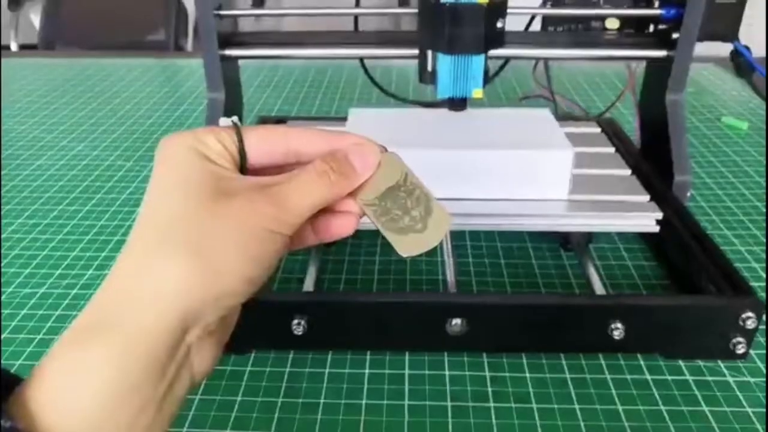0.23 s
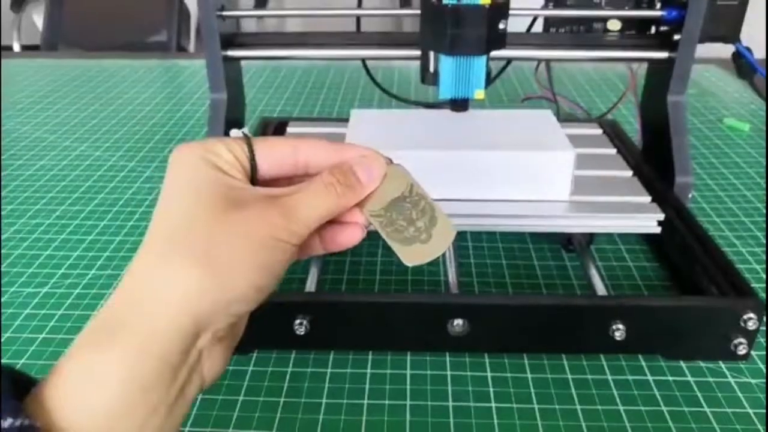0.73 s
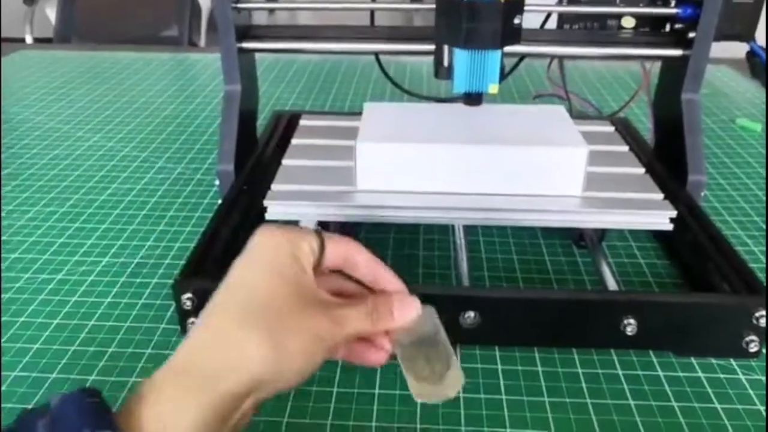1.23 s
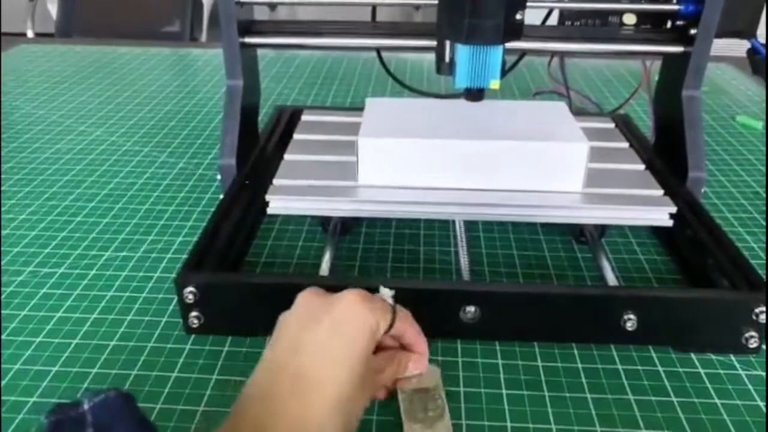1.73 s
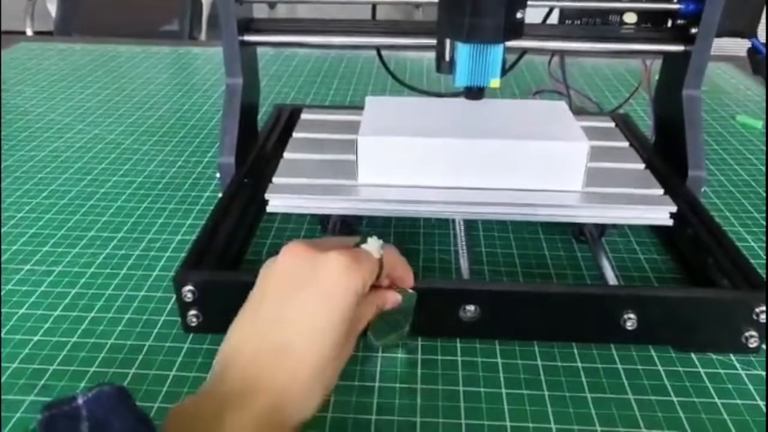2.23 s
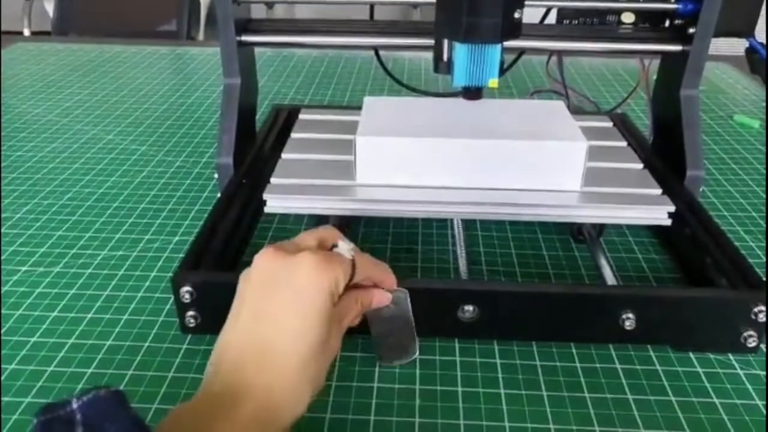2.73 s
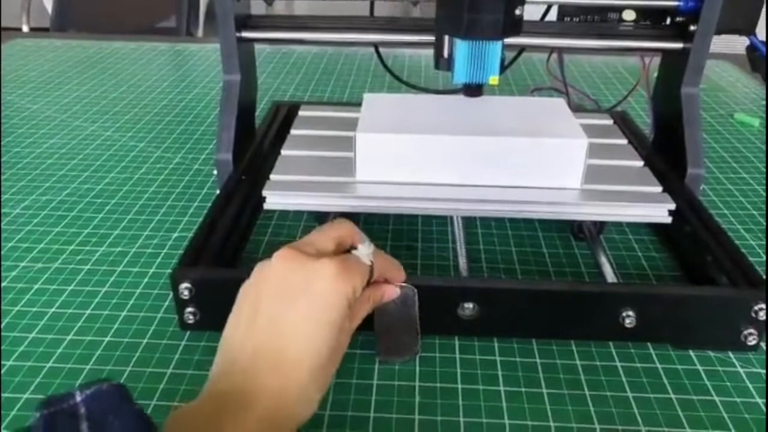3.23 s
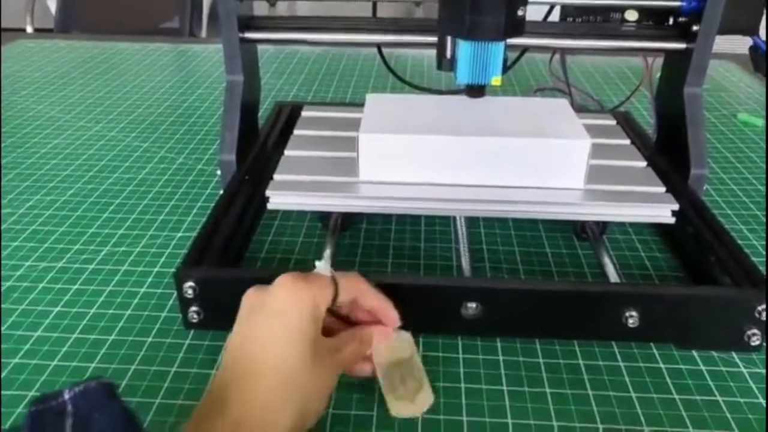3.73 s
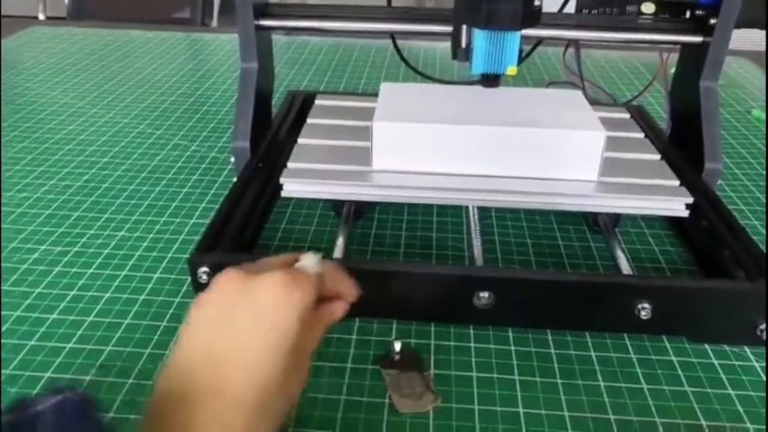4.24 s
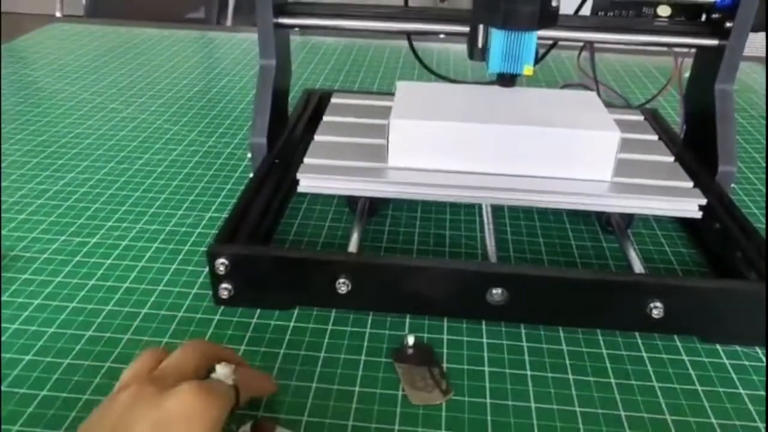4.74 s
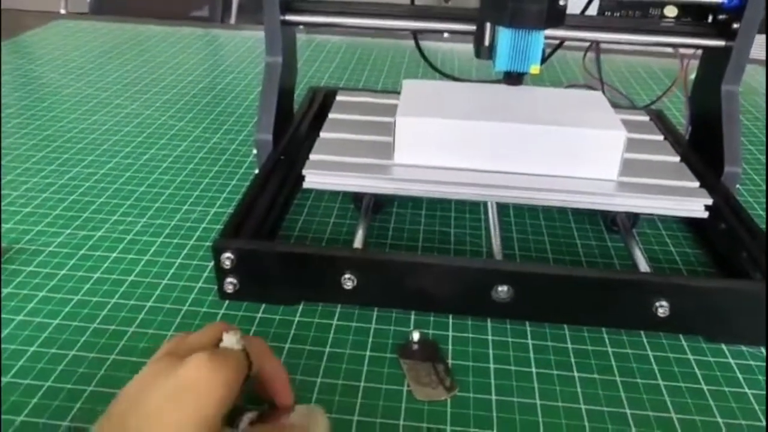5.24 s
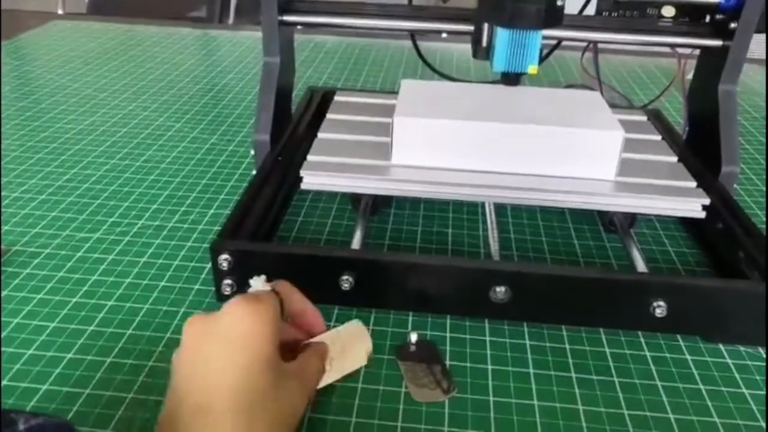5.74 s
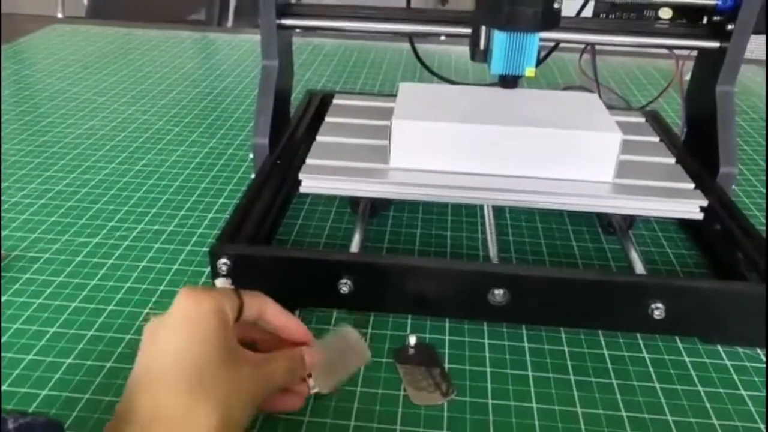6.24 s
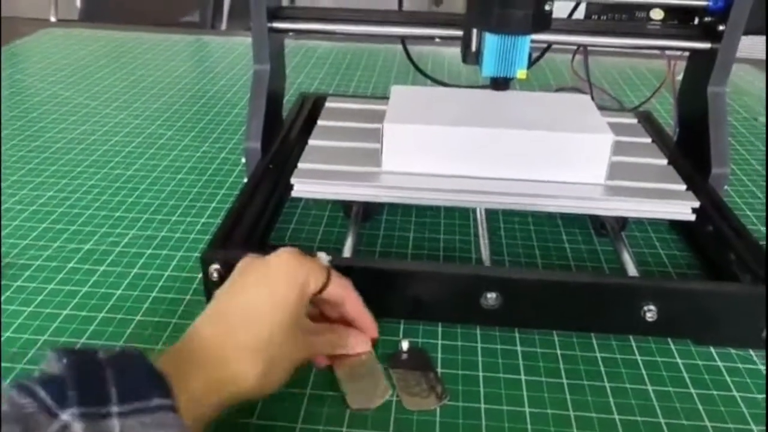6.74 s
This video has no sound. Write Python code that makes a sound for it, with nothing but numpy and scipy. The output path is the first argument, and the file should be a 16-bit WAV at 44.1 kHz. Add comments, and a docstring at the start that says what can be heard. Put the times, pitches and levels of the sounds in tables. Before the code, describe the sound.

For the first 1.7 seconds only a faint fan is heard, a wavering hum and thin whine with soft rushing air, over swelling low rumble. At 1.74 a loud, dry clack of metal on a matted table rings out, with a short fluttering tail from a bare room. A brief scrape and light taps follow at 2.15, 2.5, 2.8 and 2.96. Firm knocks land at 3.8, 3.98 (the strongest of these) and 4.2, with chain rustle fading until about 4.9 and a dull sleeve rub. After a lull, a soft bump at 5.24 leads to quick brushing slips from 5.4 and bright tiny clinks around 5.6 to 5.75. More delicate clinks come near 6.1 to 6.2, a tiny squeak at 6.3, then muffled bumps, short scrapes and faint clinks from 6.55 to 6.9. Close stereo microphones.

```python
"""Small metal pendants are handled and set down on a cutting mat on a table, close to the microphones.
Each touch is a push that rings damped table modes, with a crack of noise from the metal edge.
Later a pendant slides (showers of tiny slips), and its ring and chain clink (decaying high modes).
The room is bare and ringing: random reflections that flutter and die band by band.
A fan hums and whines faintly nearby (wavering tones, shaped noise), over rumble and a sleeve's rub."""
import sys
import numpy as np
from scipy import signal
from scipy.fft import rfft, irfft
from scipy.io import wavfile

SR = 44100
rng = np.random.default_rng(int(sys.argv[2]) if len(sys.argv) > 2 else 0)


def output_pcm(signal):
    """Save a mono or channel-first signal as 16-bit PCM at the path in sys.argv[1].

    Samples are clipped to [-1, 1] before scaling.
    """
    pcm = np.clip(np.atleast_2d(signal).T, -1, 1) * 32767
    wavfile.write(sys.argv[1], SR, np.round(pcm).astype(np.int16))


N = 308533
TIME = np.arange(N) / SR  # s

# Spectra below are (frequency [Hz], relative density [dB per Hz]); left-right dB is positive to the left.

# Low room rumble, and the upper bass that swells with it: spectra
RUMBLE_SPECTRUM = [(20, -32), (33, -8), (44, -0.5), (52, 6.5), (62, 1.5), (75, -6), (95, -5), (130, -49)]
UPPER_BASS_SPECTRUM = [(60, -36), (125, -4), (200, -3), (330, -12), (600, -44)]
# Swells of the rumble: (time of the top [s], length [s], rise [dB])
SWELLS = [(.5, 0.46, 4.2), (1.28, 0.68, 4.4), (1.87, 0.59, 10.3), (4.08, 1, 8.1), (5.5, 1, 5.3)]
RUMBLE_REST_DB = -64.5
# Likeness of the two microphones in steady noise: (frequency [Hz], likeness [0-1])
LIKENESS = [(50, 0.82), (190, 0.88), (300, 0.68), (500, 0.041), (1000, 0.26), (2000, 0.26), (4000, 0.042),
            (8000, 0.071), (14000, 0.4)]
# Balance of steady noise: (frequency [Hz], left-right [dB])
BALANCE = [(60, 0.5), (200, -1), (400, 1), (700, 0), (1200, 5), (1600, 0), (2300, -7.5), (4200, -5),
           (7800, -1), (14000, 0)]

# Fan body and rushing air: spectra
BODY_SPECTRUM = [(40, -41), (80, -4), (115, 2), (160, -3), (220, 2.5), (300, -3), (400, -6), (520, -11.5),
                 (700, -9.5), (900, -8.5), (1200, -39)]
AIR_SPECTRUM = [(600, -28), (950, -7), (1200, -11), (1400, -14), (1650, -2.5), (2000, 5), (2400, -9.5),
                (2800, -20), (3200, -11), (5000, -16), (7000, -16), (8000, -20.5), (9300, -21.5),
                (14000, -42.5)]
BODY_DB, AIR_DB = -62.5, -54.5
# Blade tone and motor whine shift as the hand moves in front of the fan: (time [s], level [dB])
BLADE_LEVEL = [(0, -61), (.45, -58.5), (.6, -55.5), (.92, -63), (1.2, -54.5), (1.53, -62), (1.85, -53),
               (2.15, -62.5), (2.75, -55), (3.05, -60), (3.55, -57.5), (3.85, -61.5), (4.25, -55.5),
               (4.65, -60), (5.2, -60.5), (5.7, -57), (6.05, -64), (7, -63.5)]
WHINE_LEVEL = [(0, -70.5), (.9, -69), (1.18, -64), (1.36, -56), (1.5, -60.5), (1.66, -61.5), (1.85, -59),
               (2.25, -65), (2.9, -63), (3.7, -65), (4.02, -60.5), (4.25, -67), (4.9, -73), (6.78, -73.5),
               (6.93, -61.5)]
# Weaker fan tones: multiples of the shaft rate
TONE_ORDERS = [3, 15, 25, 75, 120]
# One row for each of these: (level [dB], unsteadiness [0-1], left-right [dB], follows whine [dB per dB])
TONES = [(-76, 0.35, 0, 0.5), (-72, 0, 5.5, 0), (-77, 0.43, -20, 0.5), (-74.5, 0.6, 1, 0.5),
         (-84.5, 0, 18.5, 0.53)]
# Air rings in the fan housing: (frequency [Hz], width [Hz], level [dB])
HOUSING = [(1405, 145, -66.5), (2012, 120, -65), (2672, 346, -61.5)]
SHAFT_HZ = 38.3
BLADE_ORDER, WHINE_ORDER = 5, 50  # multiples of the shaft rate
AIR_FOLLOWS, HOUSING_FOLLOWS = 0.12, 0.28  # dB per dB of whine
RIGHT_LAG_S = 30 / SR  # the fan reaches the right microphone later

# Sleeve and forearm on the table: (time of the top [s], length [s], level [dB]), then spectrum
SLEEVE_MOVES = [(4.017, 0.33, -59.5), (4.237, 0.46, -59.5), (4.676, 0.28, -59.5)]
SLEEVE_SPECTRUM = [(60, -25), (100, 1), (140, -2), (200, -3), (400, -11), (800, -48)]

# Decay of the bare room: (frequency [Hz], t60 [s])
ROOM_DECAY = [(150, 0.66), (500, 0.44), (1000, 0.56), (2500, 0.57), (5000, 0.57), (10000, 0.17),
              (14000, 0.22)]
# Reflections from the machine and nearest walls: (delay [s], level [dB], left-right [dB])
ECHOES = [(.0095, -19, -12), (0.02, -20.5, 4)]
WALL_S = 0.009  # return from the nearest wall, about 3 m of path
# Flutter between two walls: first peak after the wall return, round trip, depth either way
FLUTTER_FIRST_S, FLUTTER_TRIP_S, FLUTTER_DB = 0.011, 0.025, 1.5
# What the whole table sends into the room: spectrum as (frequency [Hz], level [dB])
TABLE_WASH = [(100, -66), (200, -21), (400, -8.5), (700, -7), (950, 3.5), (1200, 1), (1550, 0), (2100, -5),
              (2800, -7.5), (3800, -21), (5200, -19), (6200, -24), (8000, -25.5), (11000, -31),
              (14000, -54)]

# The pendant squeaks once as it turns in the fingers
SQUEAK_START_S, SQUEAK_LENGTH_S, SQUEAK_HZ, SQUEAK_DB = 6.294, 0.024, 2040, -47
# Strokes of pendant and chain: (start [s], length [s], share spent swelling [0-1], slips [per s],
# soft rubbing on the mat [dB], scraping that rings the table [dB], chain rustle [dB])
SLIDES = [(2.035, 0.15, 0.3, 490, -83, -52.5, -94), (3.999, 0.19, 0.24, 960, -88, -56, -60),
          (4.202, 0.72, 0.6, 1600, -87, -96, -62), (5.397, .1, 0.25, 3300, -52, -78, -85),
          (5.457, 0.055, 0.47, 2900, -49.5, -90, -60), (5.521, 0.21, 0.62, 3500, -70, -65, -53),
          (5.659, .12, 0.51, 3500, -66, -72, -54.5), (6.549, 0.12, 0.24, 2700, -70, -52, -61),
          (6.739, 0.065, 0.69, 1600, -62, -70, -89), (6.825, 0.085, 0.27, 2100, -62.5, -58, -86)]
# Rubbing, scraping and rustle: spectra
RUB_SPECTRUM = [(90, -19), (150, -7), (350, -2), (480, -8), (620, -0.5), (850, -1), (1080, 1.5),
                (1450, -17), (3000, -15), (9000, -39)]
SCRAPE_SPECTRUM = [(300, -27), (750, -10), (980, 9.5), (1200, -4.5), (1500, 7), (1800, 3), (2600, -11),
                   (4500, -16), (9000, -49)]
RUSTLE_SPECTRUM = [(600, -46), (1700, 3.5), (2500, -2), (4000, -4.5), (7000, -11), (10000, -13),
                   (13500, -29), (15000, -30)]
# The carried chain trembles: (start [s], length [s], link touches [per s], level [dB])
TREMBLES = [(5.541, 0.22, 350, -67), (6.032, 0.25, 290, -69), (6.501, 0.46, 200, -74.5)]
# Ring and chain strike the pendant: (time [s], level [dB], left-right [dB],
# brightness: level of the top modes [dB], low ting [dB], dry tick [dB],
# main ring, which shifts with the grip [Hz], first rebound [dB])
CLINKS = [(5.61, -51, -1, -11, -2, 8, 9700, -20), (5.664, -53, 0, -9, 5, 6, 10000, -20),
          (5.668, -47, -6, -3, 21, 20, 10100, -12), (5.706, -45.5, 7, 0, 0, 5, 10230, -11),
          (5.7195, -52, 3, 1, -2, 1, 10200, -6), (5.7319, -41, 7, -1, 2, -3, 10230, -16),
          (6.115, -58, 3, -9, 20, -6, 9860, -7), (6.149, -61, 7, -8, 3, -10, 10000, -6),
          (6.181, -43, 1, -11, -8, 3, 9950, -18), (6.1858, -43.5, 7, -14, -5, -12, 10100, -9),
          (6.576, -63, -2, -13, 7, 4, 9900, -6), (6.599, -58, 7, -5, 9, -4, 10140, -8),
          (6.731, -52.5, 3, -7, 13, -6, 9850, -4), (6.750, -62, 3, 0, 8, -6, 10000, -12),
          (6.810, -66, 7, -12, 23, -6, 10090, -18)]
# Modes of pendant and ring when the main ring is at MAIN_RING_HZ: (frequency [Hz], level [dB], t60 [s])
PENDANT = [(3820, -21, 0.013), (3880, -15, 0.022), (6450, -25, 0.0097), (9100, -9, 0.011),
           (9680, -3, 0.016), (10200, -5.5, 0.028), (10130, -8, 0.028), (10350, -14, .012),
           (11660, -10.5, 0.024), (13400, -15, 0.021)]
MAIN_RING_HZ = 10100
REBOUND_S, NEXT_REBOUND_DB = 0.0072, -2  # mean gap, change from one rebound to the next

# Pendant meets the mat: (time [s], level [dB], hardness as treble tilt [dB per octave], room send [dB],
# place: upper modes [dB], weight: low modes [dB], middle mode near 1.25 kHz [dB])
KNOCKS = [(1.7410, -13.5, 0.5, -9, -0.5, -1.5, 2), (2.149, -45, -3, -12, 11, 8, 0),
          (2.501, -32, -1, -9.5, 5, 13, 4), (2.789, -39, -1.5, -7.5, 8.5, 13, -6),
          (2.962, -51, 4, -8, 12, 11, 0), (3.8151, -22, -2, -9, 7.5, 9, -6),
          (3.977, -15, 0.9, -9, 4, 9, -4), (4.2060, -20.5, -2, -10, -5.5, 5, 0),
          (5.238, -40, -16, -5.5, 8, 12, 0), (6.5537, -38, -18.5, -1.5, 20, 11, -4),
          (6.582, -48, -14, -1, 16, 2, 0), (6.606, -48, -14, -6, 16, -3, 1),
          (6.621, -53, -14, -10, 16, 0, 3), (6.861, -34.5, -16, -3, -12, 2, -6)]
# Modes of the table top under the mat: (frequency [Hz], level [dB], t60 [s])
TABLE = [(306, -25, 0.027), (432, -24.5, 0.022), (653, -18, 0.0073), (968, -12.5, 0.04), (1010, -11, 0.036),
         (1360, -24.5, 0.026), (1514, -3.5, 0.013), (2200, -20.5, 0.01), (2940, -31, 0.051),
         (3560, -9, 0.0061), (4870, -19, 0.0063), (6920, -20.5, 0.0057), (7500, -35, 0.028),
         (9900, -38, 0.046)]
# Contact of the metal edge itself: spectrum
CRACK_SPECTRUM = [(300, -42), (1500, 12), (2500, 18), (4000, 1.5), (6000, 12), (9000, 1), (11500, 0.5),
                  (14000, -20)]
TABLE_LOW_HZ = 290  # the table top radiates little below this
EDGE_HZ = 14100  # top of the recorder's band


def amp(db):
    """Amplitude factor of a level in dB."""
    return 10 ** (np.asarray(db) / 20)


def evened(x):
    """Scales x to unit RMS."""
    return x / np.sqrt(np.mean(abs(x) ** 2) + 1e-20)


def read(points, hz):
    """Reads a table at hz, interpolating over log frequency."""
    f, value = np.transpose(points)
    return np.interp(np.log(hz + 1), np.log(f + 1), value)


def curve(rows):
    """Joins (time, value) rows by straight lines over the whole length."""
    return np.interp(TIME, *np.transpose(rows))


def hump(top_s, length):
    """Smooth rise from 0 to 1 and back, centred on top_s."""
    return np.cos(np.pi * np.clip((TIME - top_s) / length, -0.5, 0.5)) ** 2


def pan(db):
    """Splits a left-right difference evenly between the two sides."""
    return amp(np.array([[db], [-db]]) / 2)


def add(mix, s, sound):
    """Adds sound to mix in place from time s, cut at the end."""
    part = mix[:, round(s * SR):][:, :sound.shape[1]]
    part += sound[:, :part.shape[1]]


def coloured(x, spectrum):
    """Gives x the spectrum, at unit level."""
    n = x.shape[-1]
    gain = amp(read(spectrum, np.fft.rfftfreq(n, 1 / SR)))
    return evened(irfft(rfft(x) * gain, n))


def random_touches(shape, per_s, grain_db):
    """Sparse contacts at random times, of random sizes."""
    present = rng.random(shape) < per_s / SR
    return present * amp(grain_db * np.minimum(rng.exponential(1, shape), 2))


def right_lag_phase(hz):
    """Phase by which the right side trails the left; the bass arrives together."""
    return 2 * np.pi * hz * RIGHT_LAG_S * np.clip((hz - 150) / 700, 0, 1)


def ambience(spectrum):
    """Steady noise that the two microphones partly share."""
    hz = np.fft.rfftfreq(N, 1 / SR)
    a, b = rfft(rng.standard_normal((2, N)))
    same = np.where(hz < 120, 1, np.clip(read(LIKENESS, hz), 0, 1))
    left = a * np.exp(1j * right_lag_phase(hz))
    right = same * a + np.sqrt(1 - same ** 2) * b
    balance = amp(np.outer([0.5, -0.5], read(BALANCE, hz)))
    return coloured(irfft(np.array([left, right]) * balance, N), spectrum)


def rumble(upper_db=-69):
    """Low room noise with a few smooth swells, which reach up into the upper bass."""
    swell_db = sum(db * hump(s, length) for s, length, db in SWELLS)
    low = amp(RUMBLE_REST_DB) * ambience(RUMBLE_SPECTRUM)
    upper = amp(upper_db) * ambience(UPPER_BASS_SPECTRUM)
    return amp(swell_db) * (low + upper)


def wander(width):
    """Slow complex noise of the given bandwidth in Hz."""
    hz = np.fft.fftfreq(N, 1 / SR)
    noise = rng.standard_normal(N) + 1j * rng.standard_normal(N)
    return evened(np.fft.ifft(np.fft.fft(noise) / (1 + (2 * hz / width) ** 2)))


def from_fan(carrier, hz):
    """A narrow-band sound from the fan, as both microphones hear it."""
    lag = np.array([[0], [right_lag_phase(hz)]])
    return np.sqrt(2) * (carrier * np.exp(1j * (2 * np.pi * hz * TIME - lag))).real


def fan(blade_shake=0.37, whine_shake=0.32):
    """Unsteady blade tones and motor whine at multiples of the shaft rate, housing rings and rushing air."""
    whine_db = curve(WHINE_LEVEL)
    lift_db = whine_db - whine_db.mean()
    out = amp(BODY_DB) * ambience(BODY_SPECTRUM)
    out += amp(AIR_DB + AIR_FOLLOWS * lift_db) * ambience(AIR_SPECTRUM)
    for order, (db, shake, side_db, follows) in zip(TONE_ORDERS, TONES):
        tone = from_fan(evened(1 + shake * wander(5.4)), order * SHAFT_HZ)
        out += amp(db + follows * lift_db) * pan(side_db) * tone
    blades = from_fan(evened(1 + blade_shake * wander(12.0)), BLADE_ORDER * SHAFT_HZ)
    out += amp(curve(BLADE_LEVEL)) * blades
    whine = from_fan(evened(1 + whine_shake * wander(15)), WHINE_ORDER * SHAFT_HZ)
    out += amp(whine_db) * pan(-23.5) * whine
    housing = sum(amp(db) * pan(-0.63) * from_fan(wander(width), hz) for hz, width, db in HOUSING)
    return out + amp(HOUSING_FOLLOWS * lift_db) * housing


def sleeve():
    """Cloth drags softly over the table as the arm draws back: dull noise in smooth humps."""
    push = sum(amp(db) * hump(s, length) for s, length, db in SLEEVE_MOVES)
    return push * ambience(SLEEVE_SPECTRUM)


def room(x, recover_s=0.16):
    """Random reflections after the nearest wall's delay: a fluttering tail, each band dying at its own speed."""
    reflections_per_s = 3500
    taps = rng.choice([-1, 1], (2, SR)) * (rng.random((2, SR)) < reflections_per_s / SR)
    taps = taps * amp(FLUTTER_DB * np.cos(2 * np.pi * (TIME[:SR] - FLUTTER_FIRST_S) / FLUTTER_TRIP_S))
    hz, t, bands = signal.stft(taps, SR, nperseg=256)
    decay = amp(-60 * t / read(ROOM_DECAY, hz)[:, None])
    # the tail starts held down, as by the recorder's gain control, then recovers
    recovery = 1 - 0.5 * np.exp(-t / recover_s)
    tail = signal.istft(bands * decay * recovery, SR, nperseg=256)[1]
    tail = np.pad(tail, ((0, 0), (round(WALL_S * SR), 0)))
    return signal.fftconvolve(x.mean(0)[None], tail / np.linalg.norm(tail[0]), axes=1)[:, :N]


def wash(level_db, tilt_db, place_db, weight_db, size=1024):
    """Summed over all directions, the table's many modes merge into one broad pulse for the room."""
    hz = np.fft.rfftfreq(size, 1 / SR)
    octaves = np.clip(np.log2((hz + 1) / 1000), 0, 2)  # above 1 kHz
    low = np.clip((900 - hz) / 300, 0, 1)
    colour_db = read(TABLE_WASH, hz) + tilt_db * octaves
    colour_db += place_db * np.minimum(octaves, 0.5) + weight_db * low / 2
    return np.roll(irfft(amp(level_db + colour_db)), size // 8)[None]


def squeak():
    """A brief, nearly pure stick-slip tone."""
    swell = np.sin(np.pi * np.clip((TIME - SQUEAK_START_S) / SQUEAK_LENGTH_S, 0, 1))
    return amp(SQUEAK_DB) * pan(-5) * swell * np.sin(2 * np.pi * SQUEAK_HZ * TIME)


def slides(grain_db=3):
    """Many tiny slips of metal over the mat, and of chain links over each other; strokes swell and fade."""
    out = np.zeros((2, N))
    for start, length, swell, slips_per_s, rub_db, scrape_db, rustle_db in SLIDES:
        n = max(round(length * SR), 256)
        slips = random_touches(n, slips_per_s, grain_db) * rng.choice([-1, 1], (2, n))
        stroke = amp(rub_db) * coloured(slips, RUB_SPECTRUM)
        stroke += amp(scrape_db) * coloured(slips, SCRAPE_SPECTRUM)
        stroke += amp(rustle_db) * coloured(slips, RUSTLE_SPECTRUM)
        pressure = np.interp(np.arange(n) / n, [0, np.clip(swell, 0.05, 0.95), 1], [0, 1, 0])
        add(out, start, stroke * np.sin(np.pi / 2 * pressure) ** 2)
    return out


def clink(level_db, bright_db, ting_db, tick_db, ring_hz, scatter_db=4.0, tick_t60=0.011, rise_s=0.00034):
    """Metal on metal: a tick and a brief high ring; brightness lifts the top modes, a plate blow the ting."""
    t = np.arange(4096) / SR
    hz, db, t60 = np.transpose(PENDANT)[:, :, None]
    scatter, detune = rng.standard_normal((2, len(PENDANT), 1))
    low, top, gripped = hz < 5000, hz > 11000, (hz > 5000) & (hz < 12500)
    hz = hz * np.where(gripped, ring_hz / MAIN_RING_HZ, 1) * (1 + 0.005 * detune)
    size_db = db + scatter_db * scatter + bright_db * top + ting_db * low
    # the low ting reaches both sides nearly alike, higher modes at differing phases
    side_turns = rng.random((2, len(PENDANT), 1)) * (hz / MAIN_RING_HZ) ** 2
    turns = rng.random((len(PENDANT), 1)) + side_turns
    ring = (amp(size_db - 60 * t / t60) * np.sin(2 * np.pi * (hz * t + turns))).sum(1)
    tick = rng.standard_normal((2, len(t))) / 2 * amp(tick_db + bright_db / 2 - 60 * t / tick_t60)
    sound = (ring + tick) * (1 - np.exp(-t / rise_s))
    return amp(level_db) * sound / sound[:, t < 0.003].std()  # level is that of the first 3 ms


def tremble(grain_db=4, bright_db=-3, ting_db=4, tick_db=7, count=6):
    """Loose links brush the pendant at random, each with a faint clink of its own pitch."""
    out = np.zeros((2, N))
    for start, length, touches_per_s, level_db in TREMBLES:
        n = max(round(length * SR), 256)
        touches = random_touches((count, n), touches_per_s / count, grain_db)
        pitches = MAIN_RING_HZ * rng.uniform(0.975, 1.02, count)
        links = np.zeros((2, n))
        for train, hz in zip(touches, pitches):
            link = clink(0, bright_db, ting_db, tick_db, hz)
            links += signal.fftconvolve(train[None], link, axes=1)[:, :n]
        add(out, start, amp(level_db) * evened(links) * np.sin(np.pi * np.arange(n) / n))
    return out


def jingle(count=2):
    """Each strike of the loose ring is followed by a few uneven, fading rebounds."""
    out = np.zeros((2, N))
    for s, level_db, side_db, *contact, rebound_db in CLINKS:
        add(out, s, pan(side_db) * clink(level_db, *contact))
        gaps = REBOUND_S * (0.5 + rng.random(count))
        for k, delay in enumerate(np.cumsum(gaps)):
            bounce_db = level_db + rebound_db + NEXT_REBOUND_DB * k
            add(out, s + delay, pan(side_db) * clink(bounce_db, *contact))
    return out


def knock(level_db, tilt_db, place_db, weight_db, middle_db, crack_db=-19.5):
    """A short push rings the damped table top; the metal edge adds a crack of a few milliseconds."""
    t = np.arange(4096) / SR
    contact_s, rise_s = 0.004, 0.0005
    hz, db, t60 = np.transpose(TABLE)[:, :, None]
    octaves = np.clip(np.log2(hz / 1000), 0, 2)  # above 1 kHz
    low, middle = hz < 800, (hz > 1120) & (hz < 1400)
    scatter, skew = rng.standard_normal((2, 2, len(TABLE), 1))  # high modes reach each side differently
    size_db = db + tilt_db * octaves + place_db * np.minimum(2 * octaves, 1)
    size_db = size_db + weight_db * low + middle_db * middle + scatter
    phase = octaves ** 2 * skew / 2
    ring = (amp(size_db - 60 * t / t60) * np.sin(2 * np.pi * hz * t + phase)).sum(1)
    touch = np.sin(np.pi * np.sqrt(np.minimum(t / contact_s, 1)))
    edge_noise = coloured(rng.standard_normal((2, len(t))), CRACK_SPECTRUM)
    crack = amp(crack_db + 2 * tilt_db) * touch * edge_noise
    blow = (crack - ring) * (1 - np.exp(-t / rise_s))
    radiated = signal.lfilter(*signal.butter(2, TABLE_LOW_HZ, "high", fs=SR), blow)
    return amp(level_db) * pan(3.2) * radiated


def scene():
    """Knocks, clinks and slides near the microphones, their echo in the room, and the background."""
    near, knocked = np.zeros((2, 2, N))
    for s, level_db, tilt_db, send_db, place_db, weight_db, middle_db in KNOCKS:
        blow = knock(level_db, tilt_db, place_db, weight_db, middle_db)
        add(near, s, blow)
        for delay, db, side_db in ECHOES:
            add(near, s + delay, amp(db) * pan(side_db) * blow)
        add(knocked, s, wash(level_db + send_db, tilt_db, place_db, weight_db))
    clinked = jingle() + tremble()
    rubbed = slides() + squeak()
    echo = pan(-0.86) * room(amp(27.0) * knocked + amp(-8.0) * clinked + amp(-4.0) * rubbed)
    return near + clinked + rubbed + echo + fan() + rumble() + sleeve()


def record(dry):
    """The recorder's band limit: a steep low-pass."""
    low_pass = signal.firwin(255, EDGE_HZ, window=("kaiser", 8), fs=SR)
    return signal.oaconvolve(dry, low_pass[None], "same")


dry = scene()
out = record(dry)
output_pcm(out)
```